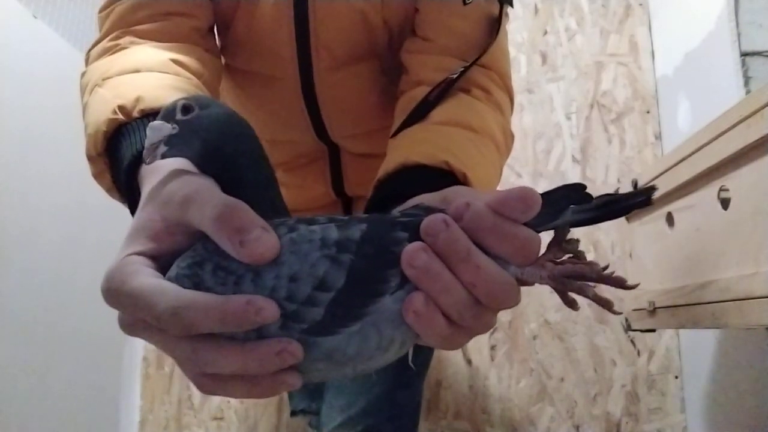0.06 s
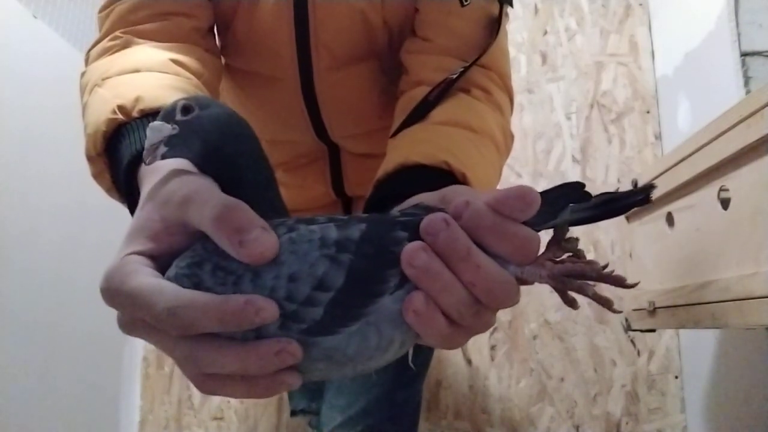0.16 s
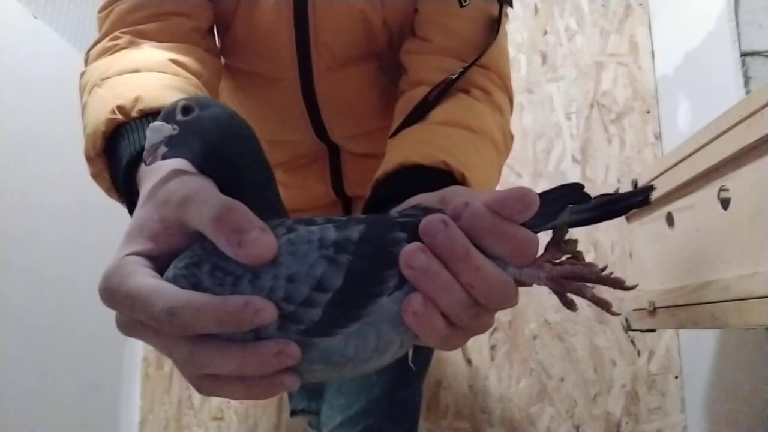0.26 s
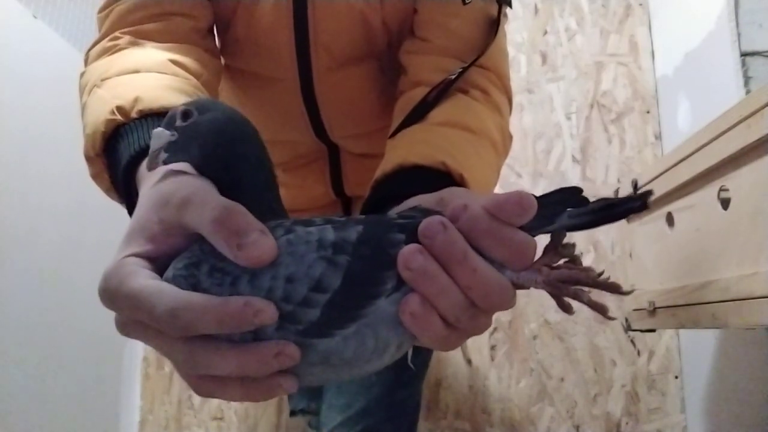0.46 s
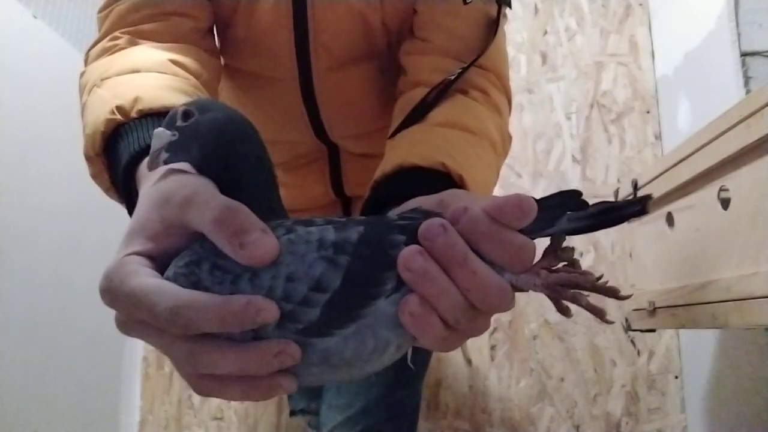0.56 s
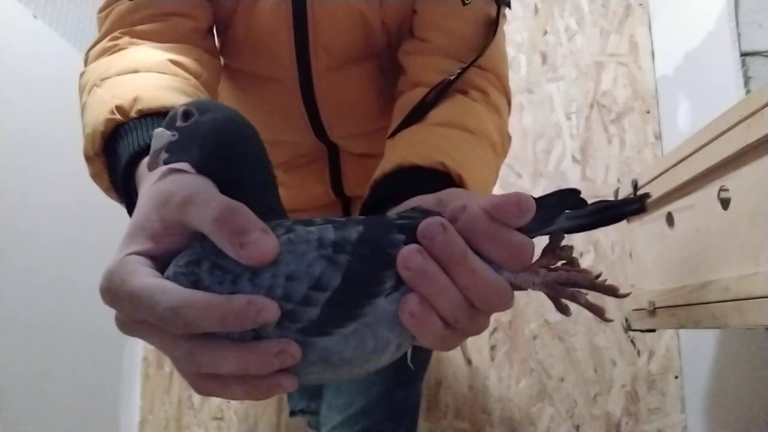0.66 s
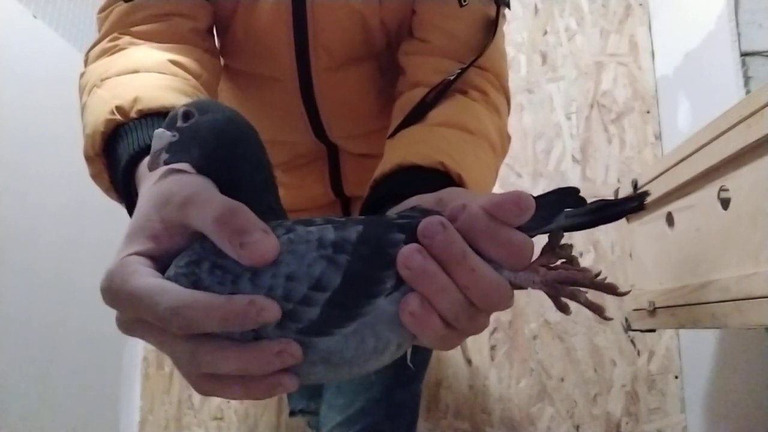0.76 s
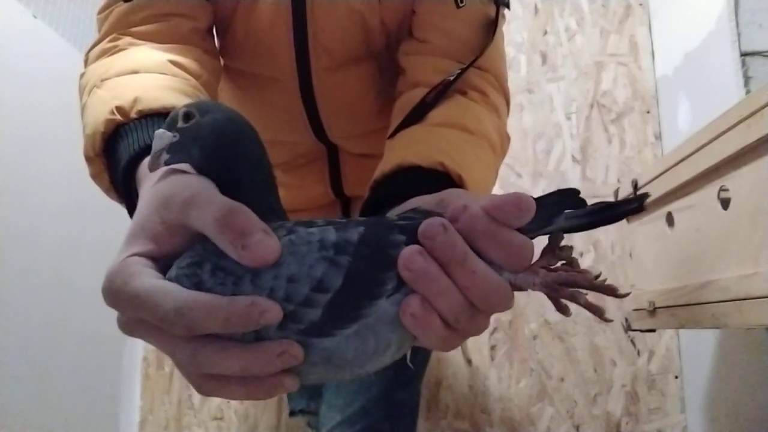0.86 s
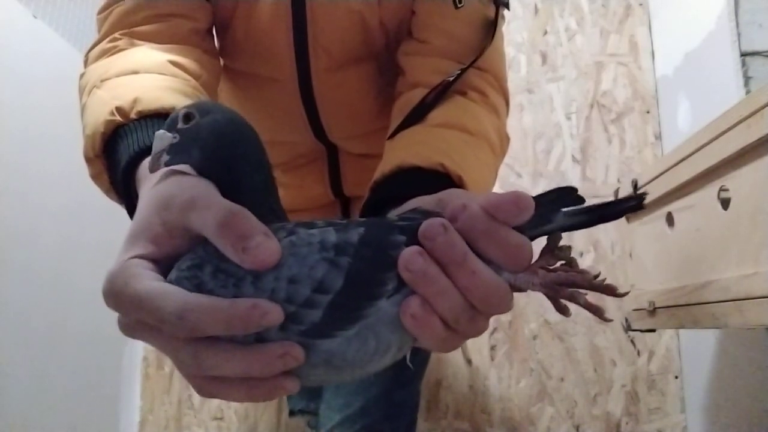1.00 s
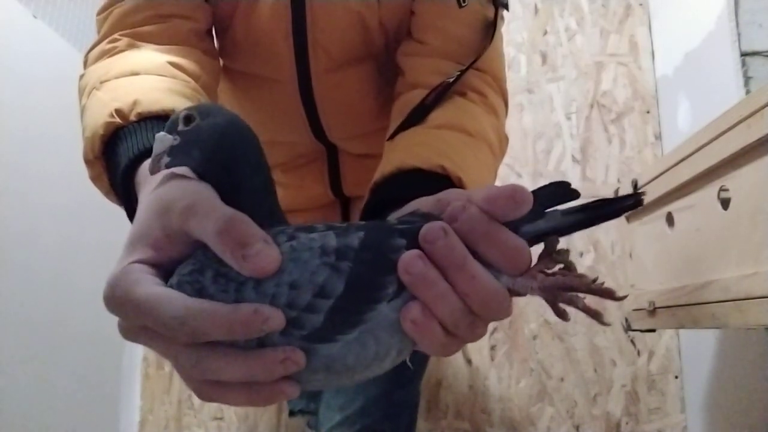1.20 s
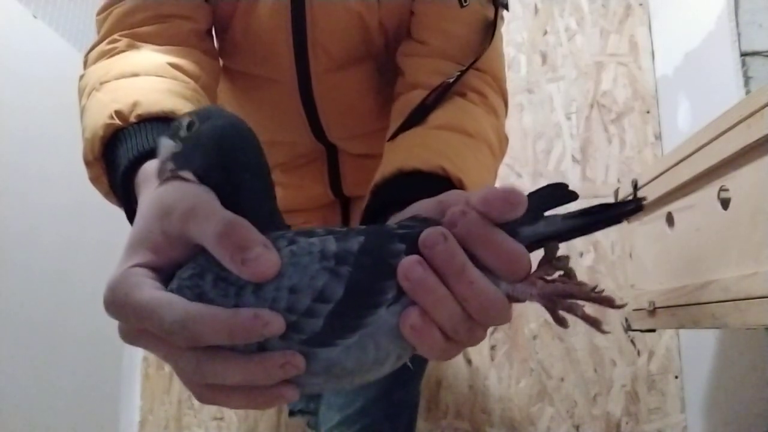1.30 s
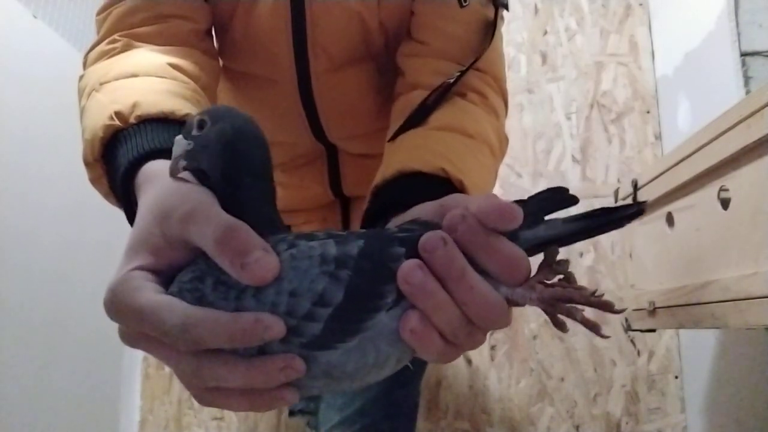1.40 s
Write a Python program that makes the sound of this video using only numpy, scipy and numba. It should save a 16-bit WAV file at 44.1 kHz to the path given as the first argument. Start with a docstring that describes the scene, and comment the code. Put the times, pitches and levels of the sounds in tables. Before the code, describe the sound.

Close pigeon coo, short and warbling, sinking low, followed by a sharp clatter on wooden boards

```python
"""A pigeon coos in a small wooden loft: a few bubbling notes, then a long falling coo; another bird murmurs farther off.
Feathers and cloth rustle, claws and wings knock on the boards; a phone with two ports listens from close by.
The birds are wavering tones with overtones and a hoarse band of noise; the knocks ring a bank of board modes.
Scrapes, rustle, flock and air are coloured noise; delay lines echo the plank walls and slow modes ring in the air."""
import sys
import numpy as np
from scipy import signal
from scipy.fft import rfft, irfft
from scipy.io import wavfile
from scipy.ndimage import uniform_filter1d
from numba import njit

SR = 44100
rng = np.random.default_rng(int(sys.argv[2]) if len(sys.argv) > 2 else 0)


def master_out(mix):
    """Clip the mix to full scale and print it as 16-bit PCM to the path in sys.argv[1]."""
    frames = np.transpose(np.atleast_2d(mix))
    ceiling = np.clip(frames, -1, 1)
    pcm = np.round(ceiling * 32767).astype(np.int16)
    wavfile.write(sys.argv[1], SR, pcm)


N = 63945
T = np.arange(N) / SR


def undb(db):
    """Decibels to gain."""
    return 10 ** (np.asarray(db) / 20)


def curve(table, col):
    """One column of a table, drawn as straight lines over time."""
    return np.interp(T, np.array(table)[:, 0], np.array(table)[:, col])


def walk(rate_hz):
    """Slow random drift with a spread near 1: held random steps, smoothed twice."""
    k = int(SR / rate_hz)
    steps = np.repeat(rng.standard_normal(N // k + 1), k)
    return 1.39 * uniform_filter1d(uniform_filter1d(steps, k), k)[:N]


def colour(x, spectrum):
    """Filter by (Hz, dB) points, scaled so that white noise comes out at rms 1."""
    hz = np.arange(N // 2 + 1) * SR / N + 1  # 1 Hz up, to keep the logarithm finite
    points = np.array(spectrum)
    gain = undb(np.interp(np.log(hz), np.log(points[:, 0]), points[:, 1]))
    gain = gain * (hz > points[0, 0] / 2)
    return irfft(rfft(x) * gain / np.sqrt(np.mean(gain ** 2)), N)


def ports(share):
    """White noise at the two ports, with the given share of its power in common."""
    a = rng.standard_normal((3, N))
    return np.sqrt(share) * a[0] + np.sqrt(1 - share) * a[1:]


def pan(db):
    """Left and right gains, the left louder by this many dB."""
    return undb(np.array([[db / 2], [-db / 2]]))


def near_bird():
    """Short bubbling notes of falling pitch, then the coo, which throbs as it slides down."""
    # Short bubbling notes. Each row: time of the peak in seconds, pitch in Hz, peak level in dB,
    # length in seconds.
    notes = [(.247, 374, -26, 0.01), (0.256, 405, -42.5, 0.0069), (0.278, 378, -38, 0.0044),
             (0.284, 384.5, -28.5, 0.0089), (0.302, 391, -34.5, 0.0095), (.319, 380.6, -34, 0.0097),
             (0.35, 268.3, -28, 0.018), (0.364, 286, -33.5, 0.0052), (0.376, 297, -32, 0.0072),
             (0.39, 301, -33, 0.0088), (0.414, 283, -43, 0.063), (0.489, 273, -42, 0.014)]
    # Long coo. Each row: time in seconds, pitch in Hz, level in dB, second harmonic in dB over the first.
    coo = [(.405, 645.8, -54.5, -21), (.43, 660.8, -64, -8), (.478, 643.4, -57.5, -52.5),
           (.492, 555, -61.5, -54), (.499, 476, -42.5, -28), (.506, 389.6, -36, -37),
           (.516, 319.6, -40, -34), (.545, 295.5, -37, -46), (.57, 248.5, -28.5, -18),
           (.588, 229.6, -31, -15), (.606, 230.7, -30, -12), (.66, 228.8, -30.5, -14),
           (.678, 196, -40.5, -3), (.69, 189, -61, 5.5), (.71, 211.4, -45.5, -21),
           (.734, 229.6, -39.5, -5.5), (.76, 221.3, -42.5, -17), (.78, 219.8, -63, -14),
           (.84, 232, -45.5, -28), (.87, 225, -92, -16)]
    note_sag = 0.085  # share of its pitch that a note loses over one length
    throb_hz, throb_depth, throb_s, throb_width_s = 53, .55, .575, .038
    bubbles = np.zeros(N)
    for s, hz, db, length in notes:
        u = (T - s) / length
        bend = 1 - note_sag * np.clip(u, -2, 2) / 2
        bubbles += undb(db) * np.exp(-4 * u ** 2) * np.cos(2 * np.pi * hz * (T - s) * bend)
    swell = throb_depth * np.exp(-((T - throb_s) / throb_width_s) ** 2)
    throb = swell * np.exp(2j * np.pi * throb_hz * (T - .569))
    on = (T > coo[0][0]) & (T < coo[-1][0])
    return bubbles + on * voice(curve(coo, 1), curve(coo, 2), curve(coo, 3), throb)


def voice(hz, db, second_db, throb=0):
    """A soft tone with two overtones, wavering a little; a throb adds a weaker tone just above."""
    wobble, flutter_db, third_db = 0.00644, 1, -18.5  # pitch share; level; third under second harmonic
    phase = 2 * np.pi * np.cumsum(hz * (1 + wobble * walk(39.08))) / SR
    first = (np.exp(1j * phase) * (1 + throb)).real
    overtones = undb(second_db) * (np.cos(2 * phase) + undb(third_db) * np.cos(3 * phase))
    return np.sqrt(2) * undb(db + flutter_db * walk(45.8)) * (first + overtones)


def hoarse(tone):
    """Breath in the throat: band noise that follows the level of the tone until the coo clears."""
    breath_db, clears_s, clearing_s = -11, 0.566, 0.027
    fade = (1 - np.tanh((T - clears_s) / clearing_s)) / 2
    return throat(N) * uniform_filter1d(np.abs(tone), size=400) * undb(breath_db) * fade


def throat(shape):
    """Noise in the band of a pigeon's throat, rms 1."""
    band_hz = [251, 546]
    sos = signal.butter(4, band_hz, "band", fs=SR, output="sos")
    band = signal.sosfilt(sos, rng.standard_normal(shape))
    return band / np.std(band)


def far_bird():
    """A rising murmur in the same kind of voice, farther off."""
    # The farther bird. Each row: time in seconds, pitch in Hz, level in dB.
    murmur = [(0, 198, -50), (.03, 220.4, -72), (.06, 194.5, -59), (.1, 229.3, -43.5), (.118, 263, -51.5),
              (.14, 327, -54), (.172, 372.7, -54), (.2, 402, -60.5), (.24, 410, -90)]
    return (T < murmur[-1][0]) * voice(curve(murmur, 1), curve(murmur, 2), -12.5)


def moves():
    """Claws, wings and cloth: the same grains ring the boards and scrape, feathers rustle, the floor thumps."""
    grains = grit(2)
    return boards(grains) + scrape(grains) + rustle() - thump()


def boards(grains):
    """Gritty contacts and single hard taps, each setting off the modes of the planks."""
    # Single hard taps on the boards. Each row: time in seconds, peak level in dB before panning.
    blows = [(.039, -51), (0.372, -43.5), (.785, -35), (.838, -39), (1.1415, -24), (1.1454, -30.5),
             (1.151, -22), (1.158, -32), (1.1673, -22.5), (1.32, -53)]
    free = ring(0.77)
    damped = ring(0.3)  # a dragging foot shortens the ring
    taps = np.zeros((1, N))
    for s, db in blows:
        taps[0, int(s * SR)] += undb(db) / free.max()
    scuff = signal.fftconvolve(ports(0.67) * grains * bursts(1), damped, axes=1)
    knocks = signal.fftconvolve(taps, free, axes=1)
    return (scuff + knocks)[:, :N] * pan(2.5)


def ring(damp):
    """The boards' answer to one click at both ports: decaying modes, cut to this share of their length."""
    # Modes of the boards. Each row: frequency in Hz, level in dB, undamped time to fall by 60 dB in seconds.
    modes = [(184.6, -20.5, .1), (356, -12, 0.1), (403, -6.5, 0.053), (552, -10.5, 0.044),
             (661, -10.5, 0.064), (780.3, 0, 0.061), (832, 4.5, 0.037), (1158, 3.5, 0.014),
             (1298, -5, 0.039), (1626, -13.5, 0.039), (1985, -12.5, 0.033), (2304, -14.5, 0.033),
             (2760, -15.5, 0.021)]
    lag_s = 0.00035  # the left port hears the boards this much later
    t = T[:SR // 4]
    late = t - np.array([[lag_s], [0]])
    out = np.zeros((2, len(t)))
    for k, (hz, db, t60) in enumerate(modes):
        decay = undb(db - 60 * t / (t60 * damp))
        out += decay * (-1) ** k * np.sin(2 * np.pi * hz * late) * (late > 0)
    return out / np.sqrt(np.sum(out ** 2) / 2)


def bursts(col):
    """Level over time of one layer of the moves: each rises, holds and dies away, powers adding."""
    # Knocks and scrabbles. Each row: time of full level in seconds, boards level in dB, scrape level in dB,
    # rustle level in dB, length of the hold in seconds; levels before panning.
    contacts = [(0.035, -56.5, -54.5, -53.5, 0.02), (0.2, -55, -63, -62.5, 0.034),
                (0.252, -61, -67, -55.5, 0.064), (0.265, -60.5, -77, -51, 0.022),
                (0.369, -53.5, -64, -66.5, 0.015), (0.55, -63, -62.5, -70.5, 0.015),
                (0.588, -64, -66, -87, 0.011), (0.641, -64.5, -62.5, -84, 0.0082),
                (0.763, -80, -54.5, -60.5, 0.0067), (0.775, -51.5, -45, -51.5, 0.018),
                (0.824, -49.5, -56, -51, 0.017), (0.887, -48, -58.5, -86, 0.023),
                (1.09, -54, -53, -64, 0.059), (1.139, -30.5, -40, -45, 0.013),
                (1.161, -57, -41.5, -58, 0.0055), (1.188, -51, -60.5, -69, 0.029),
                (1.317, -61, -49.5, -49.5, 0.028), (1.346, -50.5, -53, -59, 0.018),
                (1.434, -75, -58.5, -65.5, .02)]
    attack_s, tail_s = 0.0031, 0.024
    power = np.zeros(N)
    for row in contacts:
        t = T - row[0]
        rise = np.clip(t / attack_s + 1, 0, 1) ** 2
        power += undb(2 * row[col]) * rise * np.exp(-2 * np.clip(t - row[4], 0, 1) / tail_s)
    return np.sqrt(power)


def grit(db):
    """Uneven grains 40 samples long with random sizes, rms 1."""
    sizes = np.minimum(rng.exponential(size=N // 40 + 1), 3.5)
    g = undb(db * np.repeat(sizes, 40)[:N])
    return g / np.sqrt(np.mean(g ** 2))


def scrape(grains):
    """Claws dragging on wood: grainy noise, nearly separate at the two ports."""
    # Colour of the scrape. Each row: frequency in Hz, density in dB per Hz before scaling to rms 1.
    spectrum = [(180, -14), (300, 2), (686, -10.5), (860, -11.5), (1080, -11.5), (1250, -6.5),
                (6000, -20.5), (7800, -26.5), (13200, -120)]
    return colour(ports(0.15) * grains * bursts(2), spectrum) * pan(0.47)


def rustle():
    """Crackling feathers and a smoother, brighter slide of cloth, both in a treble colour."""
    # Colour of the rustle. Each row: frequency in Hz, density in dB per Hz before scaling to rms 1.
    spectrum = [(2060, -6.5), (3500, -8.5), (4230, -11), (4580, -11.5), (5330, -11), (6320, -7.5),
                (7540, -1.5), (9220, 3.5), (15000, -35)]
    # Cloth sliding. Each row: time in seconds, level in dB before colouring.
    swish = [(.86, -75.5), (.93, -60.5), (.97, -60), (1.045, -55.5), (1.09, -56.5), (1.14, -54),
             (1.25, -65.5), (1.4, -62), (1.45, -70)]
    bright = signal.lfilter([1, -0.24], [1], ports(0.064))
    cloth = bright * undb(curve(swish, 1) + 0.75 * walk(25)) * (T > swish[0][0])
    feathers = ports(0.073) * grit(2.5) * bursts(3)
    return colour(feathers + cloth, spectrum) * pan(-2.0)


def thump():
    """The floor gives under the hard knocks: one short low pulse."""
    peak_s, hz, db, length_s = 1.163, 102, -37, 0.007
    t = T - peak_s
    return undb(db) * np.exp(-(t / length_s) ** 2) * np.cos(2 * np.pi * hz * t) * pan(5.2)


def loft(x, lags):
    """The echo of the plank walls, with each line's gain set by its length in samples."""
    t60_s, damp = 0.27, 0.26
    return walls(x + 1e-18, lags, undb(-60 * lags / SR / t60_s), damp)


@njit
def walls(x, lags, gain, damp):
    """Eight delay lines that feed each other, duller on every round."""
    line, soft, out = np.zeros((8, 4096)), np.zeros(8), np.zeros((2, len(x)))
    for i in range(len(x)):
        total = 0.
        for k in range(8):
            heard = gain[k] * line[k, (i - lags[k]) & 4095]
            soft[k] += (1 - damp) * (heard - soft[k])
            total += soft[k]
            out[k % 2, i] += soft[k] / 2
        for k in range(8):
            line[k, i & 4095] = x[i] + soft[k] - total / 4
    return out


def standing(x):
    """The loft's air rings on wherever a voice crosses one of its modes; each port meets them differently."""
    # Standing waves of the loft. Each row: frequency in Hz, gain in dB before panning.
    air_modes = [(292, 3), (390, 5), (460, 0.5), (527, 9)]
    t60_s = 0.4
    r = 1000 ** (-1 / (t60_s * SR))
    out = np.zeros((2, N))
    for k, (hz, db) in enumerate(air_modes):
        z = signal.lfilter([2 * (1 - r) * undb(db)], [1, -r * np.exp(2j * np.pi * hz / SR)], x)
        turned = z * np.exp(1j * 0.37 * k)
        out += np.array([z.real, turned.real]) * pan(7.0)
    return out


def flock():
    """Many far birds, blurred into an uneven murmur of throat noise."""
    # Murmur of the flock. Each row: time in seconds, level in dB before panning.
    swell = [(0, -53), (.12, -55.5), (.2, -60), (.4, -50), (.47, -74), (.75, -54), (.93, -61), (1.0, -88),
             (1.2, -47), (1.35, -71), (1.45, -72.5)]
    a, b = throat((2, N))
    return np.array([a, 1.04 * a + 0.43 * b]) * undb(curve(swell, 1) + 1.8 * walk(29.6)) * pan(9.8)


def air():
    """Quiet loft air, its bass and a low rumble mostly shared by both ports."""
    # Colour of the air. Each row: frequency in Hz, density in dB per Hz before scaling to rms 1.
    spectrum = [(25, -8.5), (80, -19), (120, -1), (200, 6.5), (400, -8), (630, -11.5), (1000, -14.5),
                (2000, -23.5), (4000, -27.5), (6300, -32), (9200, -21), (12500, -45), (15000, -41.5)]
    air_db, drift_db, rumble_db = -61.5, 1.5, -66.5
    sos = signal.butter(2, [20.4, 66.3], "band", fs=SR, output="sos")
    low = signal.sosfilt(sos, ports(0.93))
    rumble = low / np.std(low) * undb(rumble_db + 0.57 * walk(10.0)) * pan(5.9)
    mid, side = colour(rng.standard_normal((2, N)), spectrum)
    side = signal.sosfilt(signal.butter(1, 300, "high", fs=SR, output="sos"), side)
    wide = np.array([mid * undb(1.5) + side, mid * undb(-1) - side])
    return rumble + wide * undb(air_db + drift_db * walk(7.27))


def scene():
    """Birds louder at the left, where they come a hair later; birds and moves echo over flock and air."""
    # Lengths of the eight echo lines. Each entry: delay in samples, used whole for the birds.
    wall_lags = [701, 887, 1103, 1327, 1559, 1811, 2083, 2399]
    bird_lag_s = 0.00035
    bird_room_db, far_room_db, breath_room_db, move_room_db = -11, 3, 2, -7.5
    bird, far, near = near_bird(), far_bird(), moves()
    breath = hoarse(bird + far)
    voices = bird + far + breath
    direct = np.array([np.interp(T - bird_lag_s, T, voices), voices]) * pan(5.5)
    sent = undb(bird_room_db) * bird + undb(far_room_db) * far + undb(breath_room_db) * breath
    lags = np.array(wall_lags)
    bird_echo = loft(sent, lags) * pan(3.5) + standing(voices)
    # close to the boards the first echoes come twice as soon
    move_echo = undb(move_room_db) * loft(near.mean(axis=0), lags // 2)
    return direct + near + bird_echo + move_echo + flock() + air()


def record(dry):
    """The phone cuts the top: a steep low-pass at 15.5 kHz."""
    return signal.sosfilt(signal.ellip(8, .2, 70, 15500, fs=SR, output="sos"), dry)


dry = scene()
out = record(dry)
master_out(out)
```